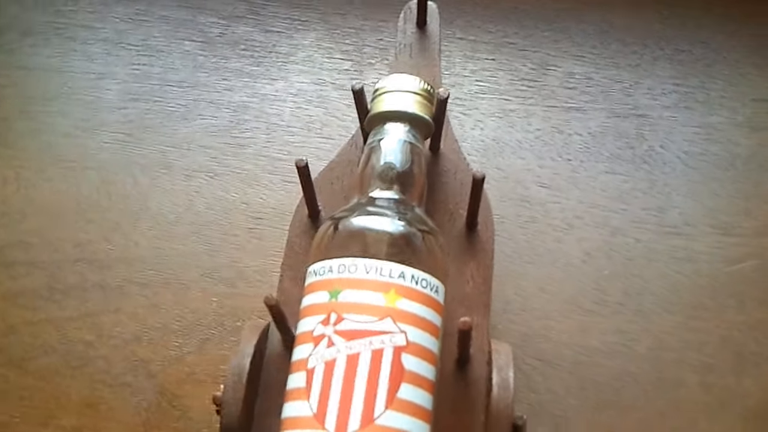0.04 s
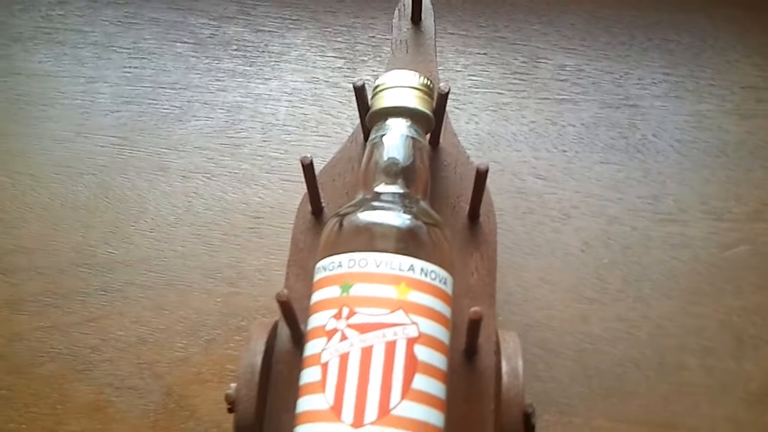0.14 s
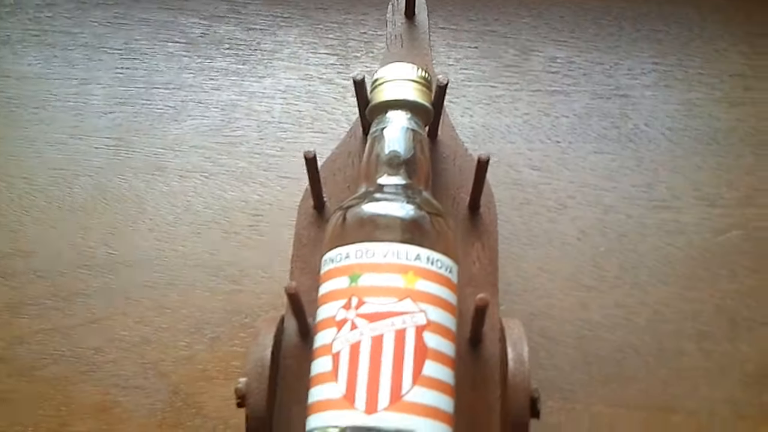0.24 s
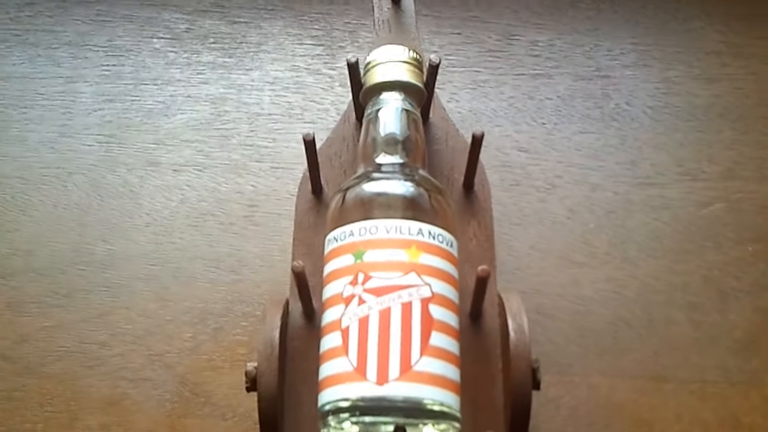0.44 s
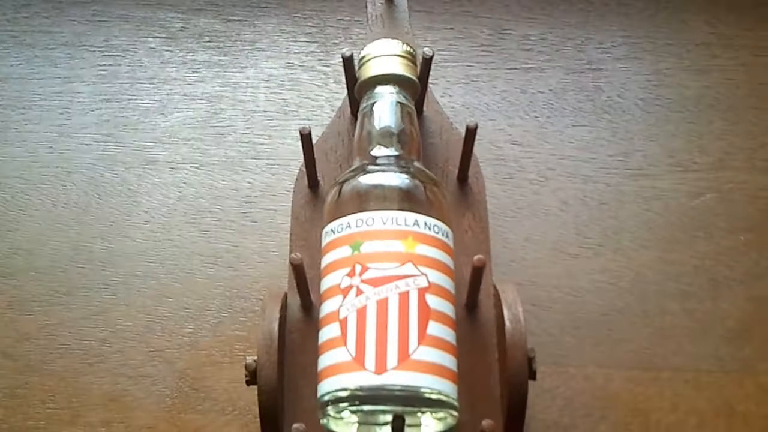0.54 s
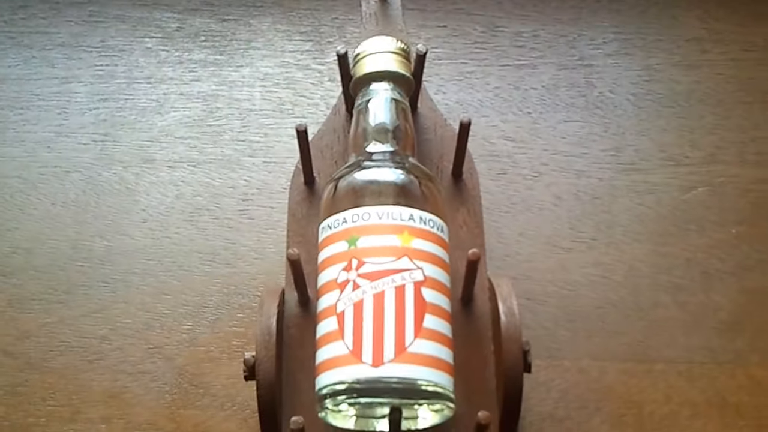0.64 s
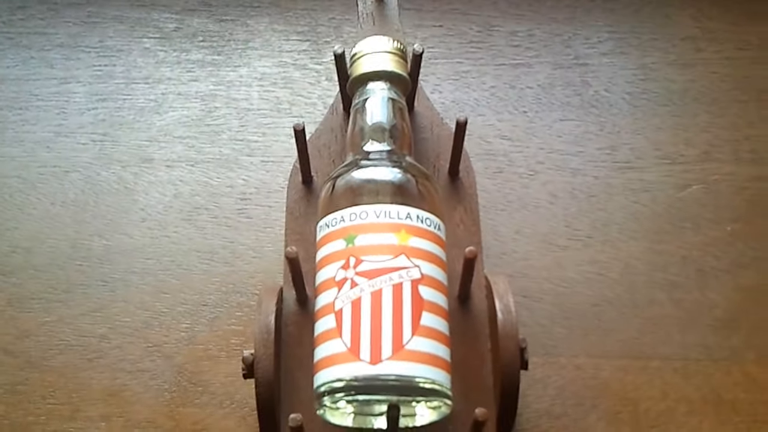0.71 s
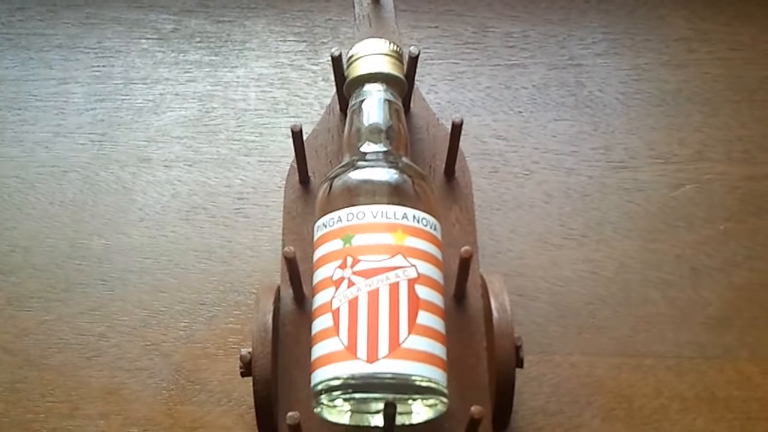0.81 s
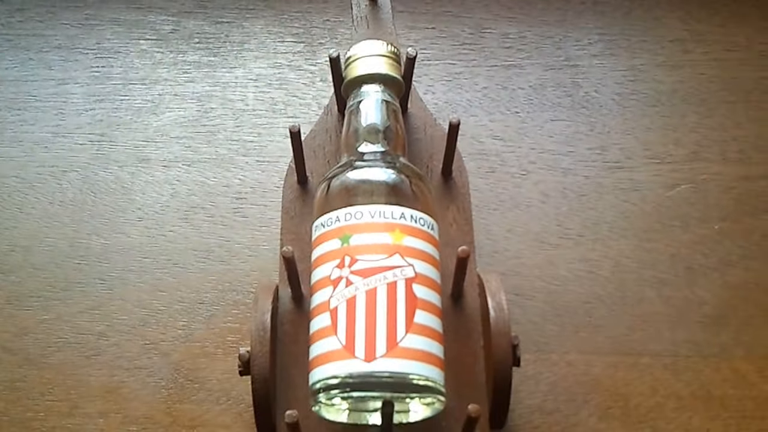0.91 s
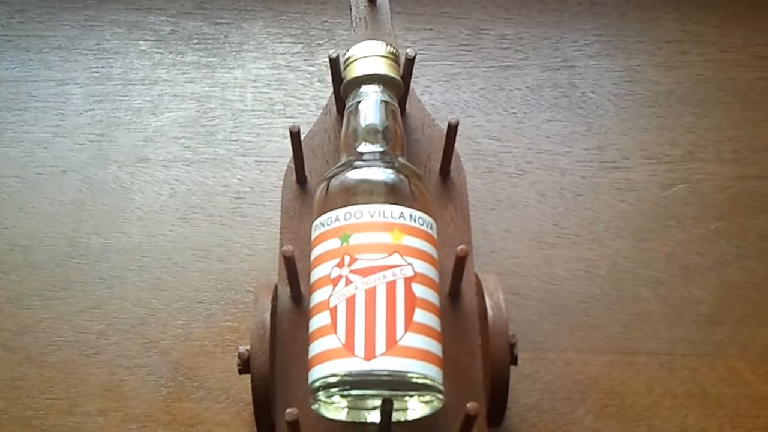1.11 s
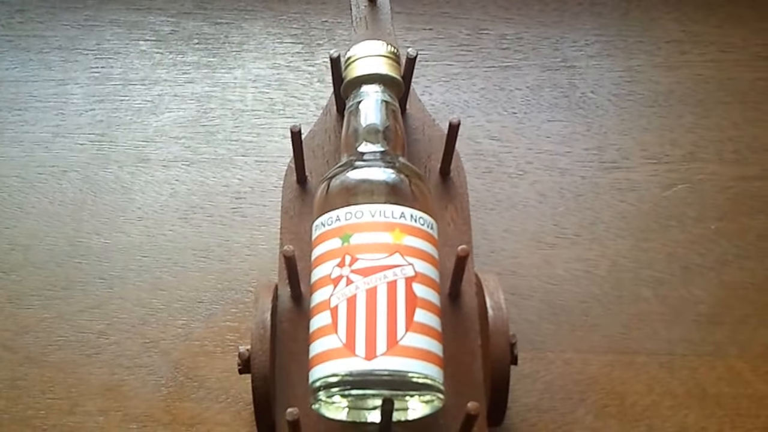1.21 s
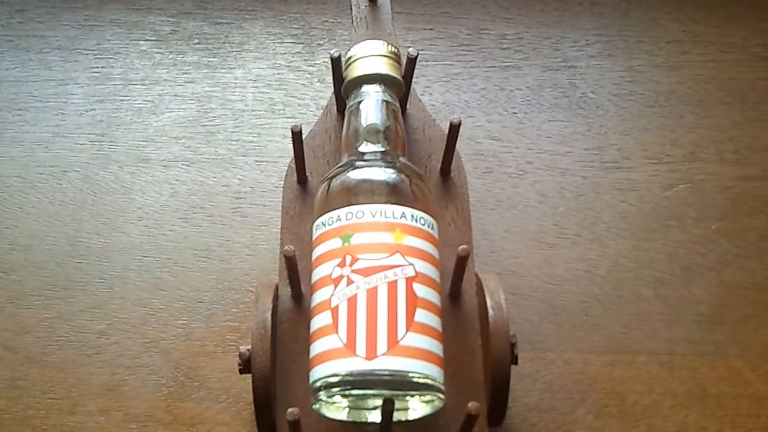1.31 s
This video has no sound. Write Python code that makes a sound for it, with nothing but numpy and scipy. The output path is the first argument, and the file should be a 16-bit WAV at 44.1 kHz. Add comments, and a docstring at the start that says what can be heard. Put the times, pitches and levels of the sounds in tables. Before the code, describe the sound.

Handling noise from a hand shifting its grip on the microphone: soft low knocks, one stronger dull bump, then weaker bumps among small dry ticks. Behind it, a quiet room hisses steadily with a faint hum.

```python
"""A quiet room, heard through the one microphone of a hand-held camera, with the hand right on it.
From the start there is steady hiss, a faint hum and the low rumble of the moving hand.
A quarter second in, the grip shifts: soft pushes rock the case, then one strong dull bump.
Weaker bumps follow, among small dry ticks close to the microphone, like lip or tongue clicks.
The hand settles, and the hum swells at the very end."""
import sys
import numpy as np
from scipy import signal
from scipy.fft import rfft, irfft, next_fast_len
from scipy.io import wavfile
from scipy.ndimage import map_coordinates

SR = 44100
rng = np.random.default_rng(int(sys.argv[2]) if len(sys.argv) > 2 else 0)


def store_wav(level_fs):
    """Save 16-bit WAV to argv[1]."""
    pcm = np.round(np.clip(np.atleast_2d(level_fs), -1, 1) * 32767)
    wavfile.write(sys.argv[1], SR, pcm.T.astype(np.int16))


N = 59535

# spectrum of the room's hiss (frequency [Hz], relative level [dB])
HISS_SPECTRUM = [(20, -1), (85, 0), (170, 6.5), (210, -3), (260, 0), (360, -1), (480, -8), (700, -11),
                 (1100, -11), (1800, -15), (2600, -17.5), (4500, -21.5), (6500, -22), (7600, -21),
                 (8500, -35)]
# course of the background hum (time [s], level [dB])
HUM_LEVELS = [(0, -58), (1.0, -55), (1.23, -54), (1.275, -41.5), (1.35, -38.5)]
# course of the handling rumble at the microphone (time [s], level [dB])
RUMBLE_LEVELS = [(0, -35.5), (.19, -43), (.28, -28.5), (.43, -36), (.62, -42), (.67, -44), (.81, -35),
                 (.88, -40), (1.0, -38), (1.08, -40), (1.17, -46), (1.35, -45)]
# spectrum of that rumble (frequency [Hz], relative level [dB])
RUMBLE_SPECTRUM = [(10, -18), (25, 11), (52, 3), (80, -9), (105, -8), (140, -18), (200, -39), (400, -41.5),
                   (900, -81.5)]
# pushes of the hand on the case
# (time [s], strength [dB], contact [ms], grip damping [1 = light hold], pitch from stiffness [factor])
PUSHES = [(0.2391, -11, 11.3, 1.13, 1.06), (0.244, -17.5, 6, 0.62, 0.93), (0.2627, -12.5, 8.8, 1.4, 1.04),
          (0.279, -38, 3, 1.2, 1.35), (0.3058, -26.5, 7.9, 0.49, 1.07), (0.3657, -4, 17.6, 2, 1.11),
          (0.457, -26.5, 9.1, 1.036, 1.02), (0.4852, -27, 7.2, 0.87, 0.94), (0.4948, -24, 5.37, 5.2, 1.6),
          (0.516, -22, 8.2, 3.5, 1.13), (0.5819, -19, 11.8, 2.6, 1.08), (0.631, -22.5, 12.7, 2.6, 0.863),
          (0.709, -24, 12, 0.96, 1.08), (0.72, -27, 8.6, 1.36, 0.95), (0.7384, -22, 9.2, 1.8, 0.9)]
# case modes before the grip scales them (frequency [Hz], relative level [dB], time to fall 60 dB [s])
CASE_MODES = [(38.7, -1, 0.42), (67.24, -4, 0.43), (121.3, 6.5, 0.084), (182.3, -1.5, 0.15),
              (272.6, 14, 0.042)]
# spectrum of skin dragging on the case (frequency [Hz], relative level [dB])
DRAG_SPECTRUM = [(30, -28), (60, 0.5), (120, 1.5), (165, -14.5), (210, -13), (370, -27.5), (550, -43),
                 (1000, -87)]
# small dry ticks close by (time [s], snap [dB], scuff [dB], scuff decay [s], ring [dB])
DRY_TICKS = [(0.4542, -46, -55, 0.003, -54), (0.4615, -41, -50, 0.012, -54), (0.4895, -42, -58, 0.004, -70),
             (0.524, -46, -55, 0.006, -63), (0.5495, -44, -55, 0.005, -51), (0.5732, -28, -43, 0.004, -58),
             (0.583, -50, -51, 0.028, -58), (0.626, -39, -45, 0.006, -61), (0.6985, -39, -55, 0.003, -72),
             (0.9458, -42, -52, 0.011, -67)]
# spectrum of the scuff around a tick (frequency [Hz], relative level [dB])
SCUFF_SPECTRUM = [(300, -54), (1500, -11.5), (2500, -1.5), (4500, -4), (5800, 1), (7600, 4), (8500, -6)]

HISS_DB, HUM_HZ, HUM_WANDER = -47, 106.8, 0.017
GRIP_HZ = 50  # a firm grip holds back the rocking below this
DRAG_DB, DRAG_RISE_S, DRAG_T60_S = -13.5, 0.017, 0.15  # level relative to the push; decay in a light hold
SNAP_HZ, SNAP_T60_S = 6600, 0.00076
RING_HZ, RING_T60_S = 2480, 0.03
SCUFF_GRAIN_DB, SCUFF_RISE = 3, 0.47  # unevenness; rise time over decay time
BAND_LIMIT_HZ = 8500


def amp(db):
    """Decibels to gain."""
    return 10 ** (np.asarray(db) / 20)


def unit(x):
    """Scale to rms 1."""
    return x / np.sqrt(np.mean(x ** 2) + 1e-20)


def level(points):
    """Gain per sample from (time [s], level [dB]) points."""
    return amp(np.interp(np.arange(N) / SR, *np.transpose(points)))


def wobble(rate_hz):
    """A smooth random curve through rate_hz knots a second."""
    knots = rng.standard_normal(int(N * rate_hz / SR) + 4)
    return map_coordinates(knots, [np.arange(N) * rate_hz / SR])


def filtered(x, response):
    """Filter x by a gain given as a function of frequency."""
    size = next_fast_len(N + SR // 2)
    gain = response(np.fft.rfftfreq(size, 1 / SR))
    return irfft(rfft(x, size) * gain, size)[:N]


def noise(spectrum):
    """Noise of rms 1, shaped by (frequency [Hz], level [dB]) points joined on a log axis."""
    points_hz, db = np.transpose(spectrum)
    white = rng.standard_normal(N)
    return unit(filtered(white, lambda hz: amp(np.interp(np.log(hz + 1), np.log(points_hz), db))))


def room_tone():
    """The bed of the room: even hiss and a low, slightly unsteady hum that swells at the end."""
    hiss = amp(HISS_DB) * noise(HISS_SPECTRUM)
    hum_hz = HUM_HZ * (1 + HUM_WANDER * wobble(rate_hz=13.8))
    hum = unit(np.sin(2 * np.pi * np.cumsum(hum_hz) / SR))
    return hiss + level(HUM_LEVELS) * hum


def hand_rumble():
    """The moving hand shakes the microphone, less as it settles."""
    return level(RUMBLE_LEVELS) * noise(RUMBLE_SPECTRUM)


def case_bumps():
    """Each push rocks the case; long contacts sound duller, and a firm grip stops the ring sooner."""
    t, bumps = np.arange(N) / SR, np.zeros(N)
    for start, db, contact_ms, damping, pitch in PUSHES:
        ring = np.zeros(N)
        for hz, mode_db, t60 in CASE_MODES:
            decay = amp(mode_db - 60 * damping * t / t60)
            restraint = damping if hz < GRIP_HZ else 1
            ring += decay * np.cos(2 * np.pi * hz * pitch * t) / restraint
        progress = np.clip((t - start) * 1000 / contact_ms, 0, 1)
        force = np.sin(np.pi * progress) ** 2
        bumps -= amp(db) * signal.fftconvolve(force / force.sum(), ring)[:N]
    return bumps


def skin_drag():
    """Skin drags on the case after each push: a short, low rub right at the microphone."""
    t, envelope = np.arange(N) / SR, np.zeros(N)
    for start, db, _, damping, _ in PUSHES:
        age = np.maximum(t - start, 0)
        rise = 1 - np.exp(-age / DRAG_RISE_S)
        decay = amp(db - 60 * damping * age / DRAG_T60_S)
        envelope = np.hypot(envelope, rise * decay)  # overlapping rubs add in power
    return amp(DRAG_DB) * envelope * noise(DRAG_SPECTRUM)


def dry_ticks():
    """Close ticks, like lip or tongue clicks: each a tiny snap and a thin ring in a short grainy scuff."""
    t = np.arange(N) / SR
    snaps, rings, scuff_envelope = np.zeros((3, N))
    for start, snap_db, scuff_db, scuff_decay_s, ring_db in DRY_TICKS:
        age, lead = np.maximum(t - start, 0), np.maximum(start - t, 0)
        snaps += amp(snap_db - 60 * age / SNAP_T60_S) * np.sin(2 * np.pi * SNAP_HZ * age)
        rings += amp(ring_db - 60 * age / RING_T60_S) * np.sin(2 * np.pi * RING_HZ * age)
        scuff_envelope += amp(scuff_db) * np.exp(-(age + lead / SCUFF_RISE) / scuff_decay_s)
    grains = unit(amp(SCUFF_GRAIN_DB * wobble(rate_hz=900)))
    return snaps + rings + scuff_envelope * grains * noise(SCUFF_SPECTRUM)


def scene():
    """Room tone behind, handling noise and ticks up close, in mono at the camera's microphone."""
    return (room_tone() + hand_rumble() + case_bumps() + skin_drag() + dry_ticks())[None]


def record(dry):
    """The recorder rolls off steeply at its band limit."""
    return filtered(dry[0], lambda hz: 1 / np.sqrt(1 + (hz / BAND_LIMIT_HZ) ** 100))[None]


dry = scene()
out = record(dry)
store_wav(out)
```